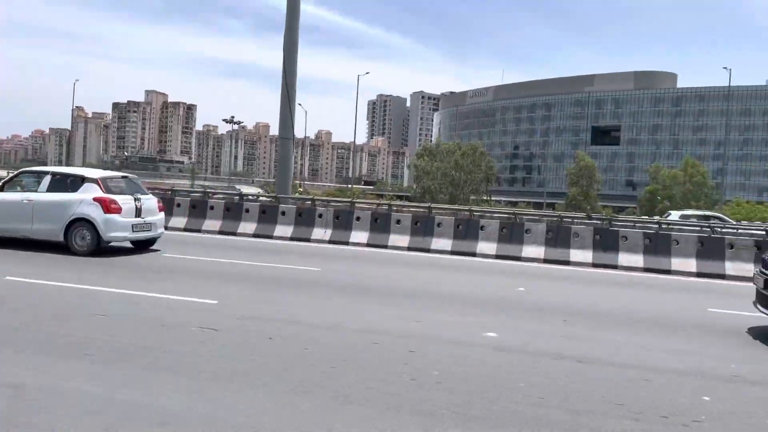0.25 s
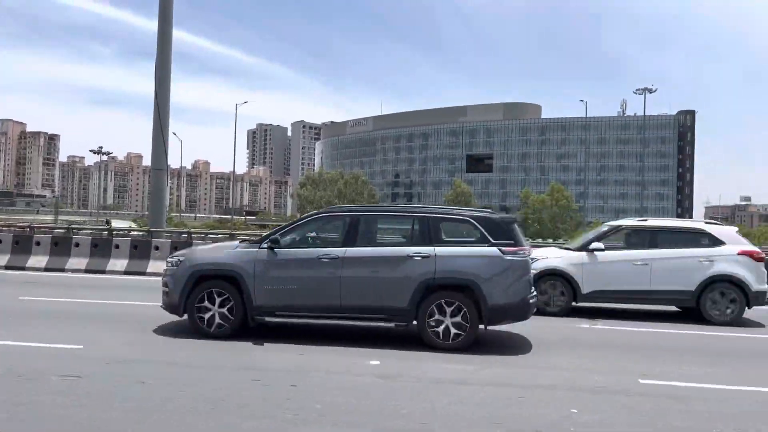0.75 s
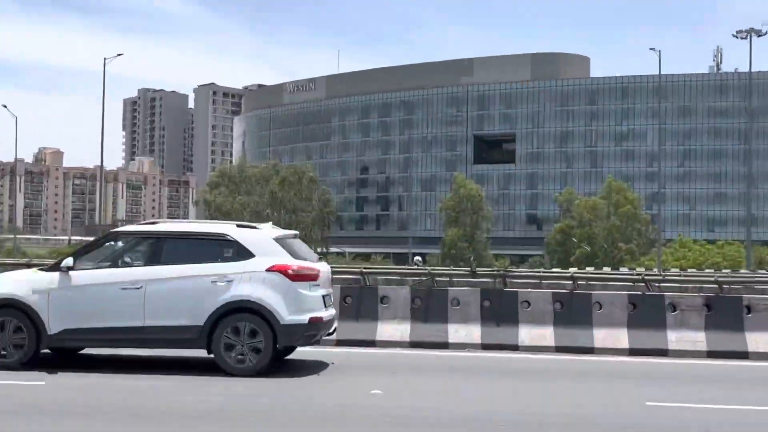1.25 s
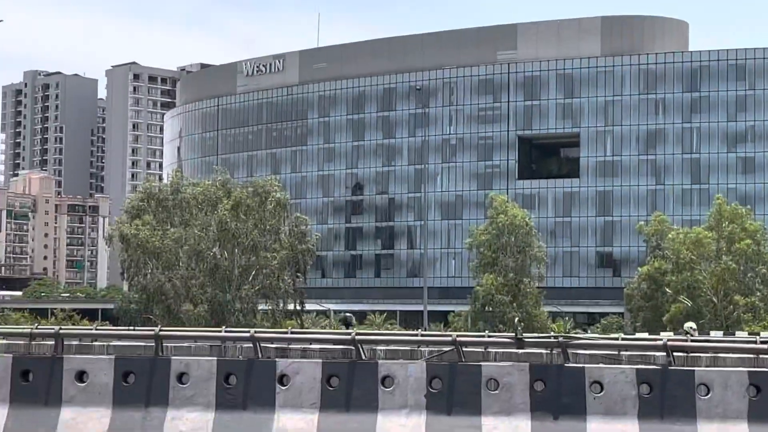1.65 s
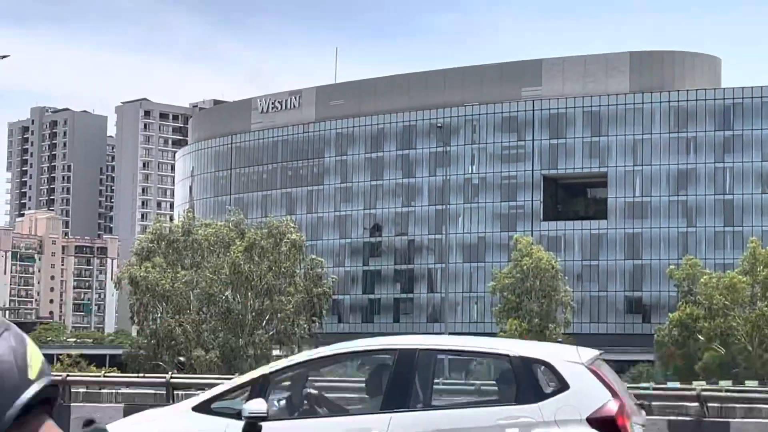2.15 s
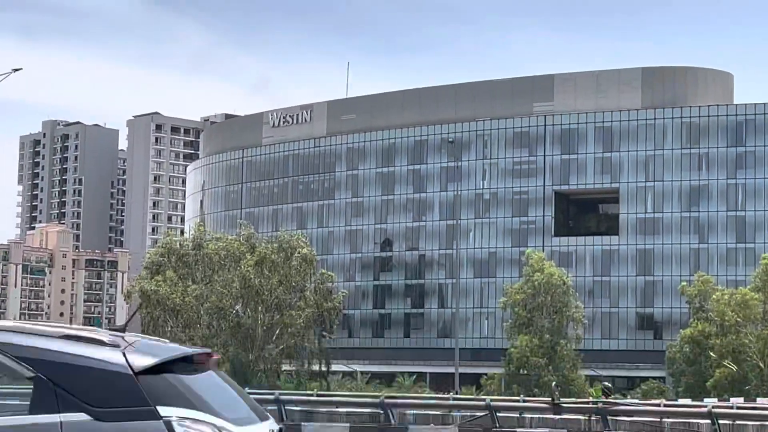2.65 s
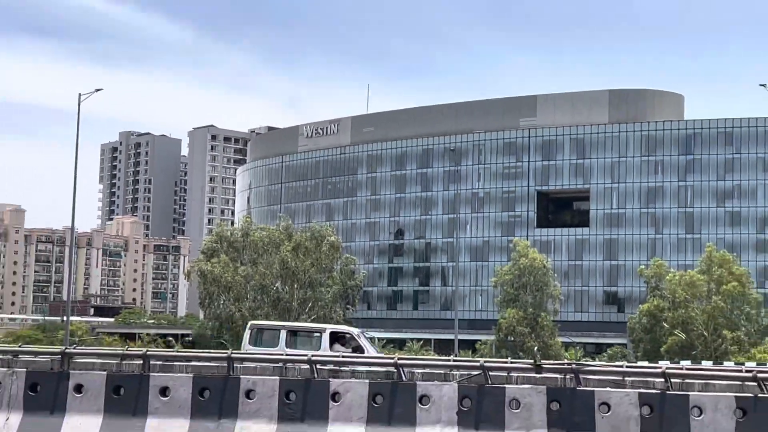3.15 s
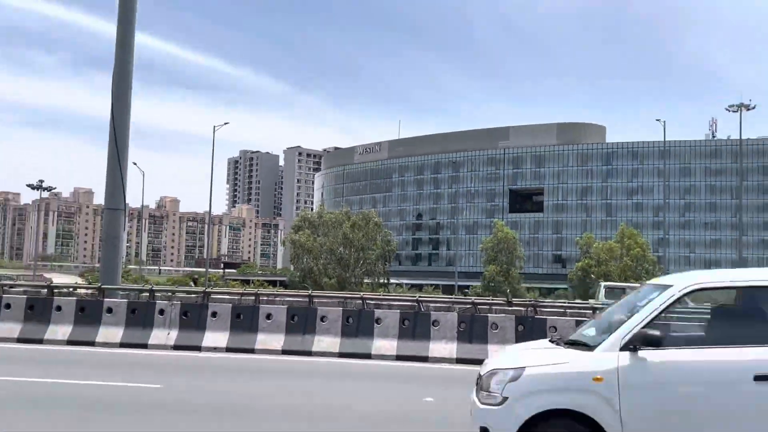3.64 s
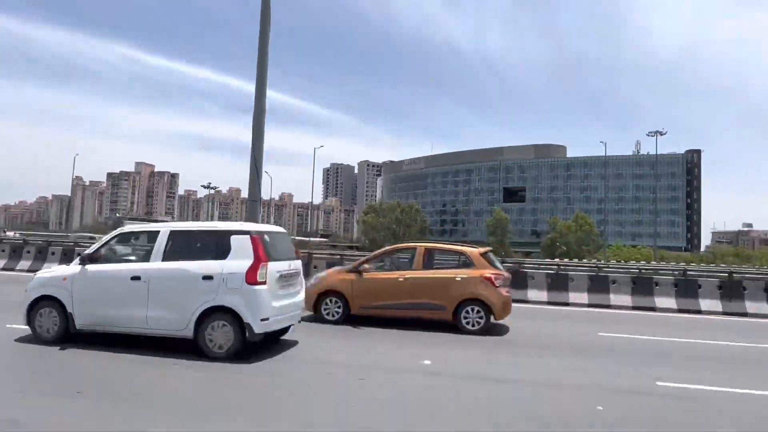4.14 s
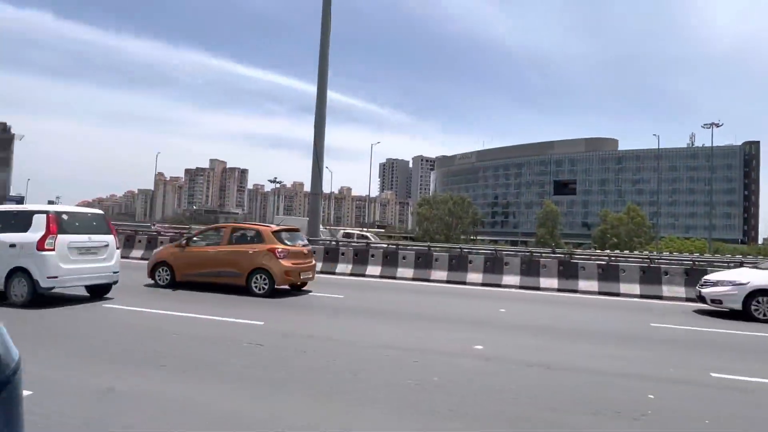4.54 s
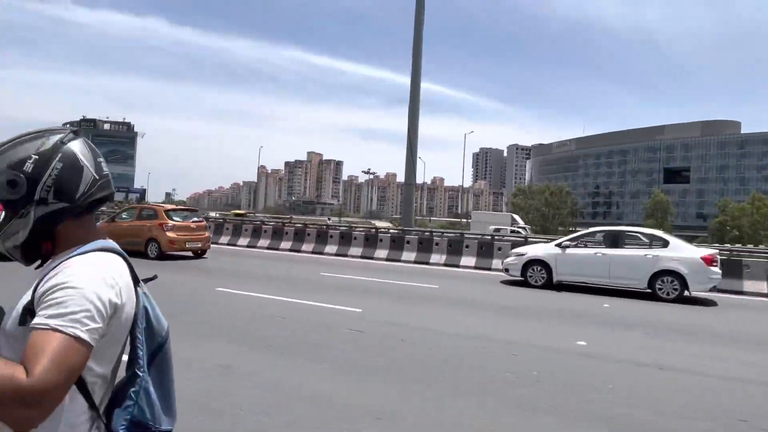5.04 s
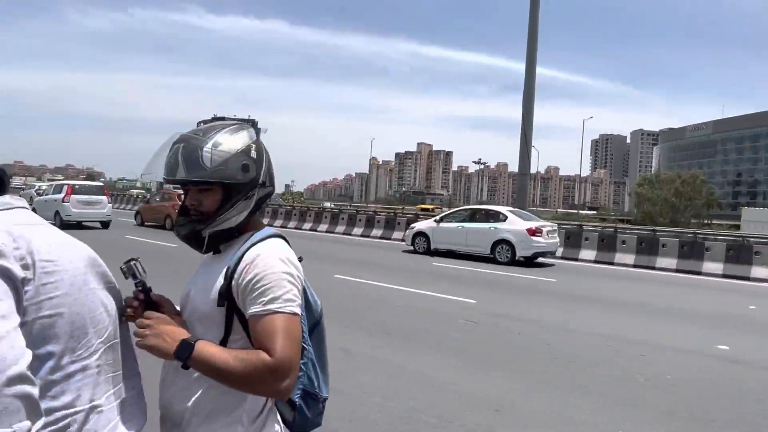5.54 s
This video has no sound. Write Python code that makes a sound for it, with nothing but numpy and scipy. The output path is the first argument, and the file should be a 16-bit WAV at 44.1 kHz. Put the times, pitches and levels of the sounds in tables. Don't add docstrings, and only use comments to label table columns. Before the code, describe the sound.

Busy highway traffic roars and hisses past while wind rumbles, flutters and pops against a handheld microphone, with a passing motorbike and brief squeaks.

```python
import sys
import numpy as np
from scipy import signal
from scipy.fft import rfft, irfft, next_fast_len
from scipy.io import wavfile
from scipy.ndimage import uniform_filter1d, map_coordinates

SR = 44100
rng = np.random.default_rng(int(sys.argv[2]) if len(sys.argv) > 2 else 0)


def wav_out(sig):
    wavfile.write(sys.argv[1], SR, np.round(np.clip(np.atleast_2d(sig).T, -1, 1) * 32767).astype(np.int16))


def makeup_ratio(level_db):
    decades = np.asarray(level_db, float) / 20
    return 10 ** decades


N = 255339


def unit(x):
    return x / np.sqrt(np.mean(abs(x) ** 2) + 1e-20)


def along(points, hz):
    f, v = np.transpose(points)
    return np.interp(np.log(hz + 1), np.log(f + 1), v)


def curves(rows):
    s, *cols = np.transpose(rows)
    return [np.interp(np.arange(N) / SR, s, c) for c in cols]


def wobble(rate):
    knots = rng.standard_normal(int(N * rate / SR) + 4)
    return map_coordinates(knots, [np.arange(N) * rate / SR])


def coloured(spectrum, size=N, stretch=1):
    m = next_fast_len(size + 4096)
    hz = np.fft.rfftfreq(m, 1 / SR)
    shaped = rfft(rng.standard_normal(m)) * makeup_ratio(along(spectrum, hz / stretch))
    return unit(irfft(shaped, m)[:size])


def left_right(mid, side):
    return np.array([mid + side, mid - side])


def port_gain(db, pan_db):
    return makeup_ratio(db + np.array([[pan_db], [-pan_db]]) / 2)


# time_s, aim (0 wide, 1 and 2 narrow ahead, 3 and 4 turning along the road)
BEAM_AIM = [(0, 0), (1.17, 0), (1.2, 1), (2.32, 1), (2.43, 2), (3.78, 2), (3.88, 2.5), (4.13, 2), (4.2, 3),
            (4.9, 3), (5.5, 4), (5.79, 4)]


def aim_share(aim):
    return np.clip(1 - abs(aim - np.arange(5)[:, None]), 0, 1)


def aimed(per_aim):
    aim, = curves(BEAM_AIM)
    return np.transpose(per_aim) @ aim_share(aim)


# time_s, level_db, pitch_hz, length_s
BRAKE_CHIRPS = [
    (.337, -46, 7030, .018),
    (.351, -47, 6770, .018),
    (.382, -53, 7150, .012),
    (.429, -46, 6920, .014),
    (.446, -46, 6810, .016),
    (.462, -48, 6960, .012),
    (.47, -52, 7150, .008),
]
# time_s, peak_db, pitch_hz, sides_against_centre_db
CASING_TICKS = [
    (3.2064, -52, 13900, -4),
    (3.2265, -39, 13700, -3),
    (3.2268, -52, 9100, 11),
    (3.3373, -40, 14000, -1),
    (3.3454, -52, 14300, -6),
    (4.6575, -47, 13300, -8),
    (4.8526, -39, 9900, -10),
    (5.1462, -44, 9820, -10),
    (5.444, -42, 9540, -10),
]


def small_sounds():
    t = np.arange(N) / SR
    chirps, ticks = np.zeros(N), np.zeros((2, N))
    for s, db, hz, length in BRAKE_CHIRPS:
        envelope = np.exp(-((t - s) / length * 2) ** 2)
        chirps += makeup_ratio(db) * envelope * np.sin(2 * np.pi * hz * t)
    for s, db, hz, side_db in CASING_TICKS:
        envelope = np.exp(-((t - s - .0007) / .00027) ** 2)
        tick = makeup_ratio(db + 2) * envelope * np.cos(2 * np.pi * hz * (t - s))
        ticks += tick * left_right(np.ones(1), makeup_ratio([side_db]))
    return left_right(makeup_ratio(5.5) * chirps, makeup_ratio(-2) * chirps) + ticks


# time_s, strength_db, shift_from_rumble_to_buffet_db
WIND_STRENGTH = [(0, -28, 1.5), (.2, -31, 0.5), (.55, -27.5, 3), (.74, -28.5, 2.5), (.9, -24, -.5),
                 (1.1, -29.5, 3), (1.45, -30, 0), (1.8, -28, 5), (2.1, -24.5, -1), (2.3, -22, -0.5),
                 (2.55, -22.5, -1.5), (2.95, -21, -0.5), (3.1, -24, -1), (3.45, -25.5, 1),
                 (3.75, -26.5, -1), (4.03, -30, 0), (4.58, -29, 0), (5.26, -33, 0.5), (5.79, -31.5, 1)]
# time_s, half_length_s, lift_db, shift_to_buffet_db
GUST_LIFTS = [(0.622, 0.062, 4, -3.5), (0.99, 0.065, 4.5, 1), (1.595, 0.07, 0.5, 1),
              (1.87, 0.064, 0.5, 2.5), (2.32, 0.048, -3, -3), (3.017, 0.044, -3, 6.5),
              (2.563, 0.03, 1, -1.5), (3.31, 0.061, 2, 2), (3.52, 0.035, -5, -1), (3.608, 0.047, 7.5, 0),
              (3.702, 0.026, -3.5, -1.5), (4.075, 0.045, 8.5, 1), (4.252, 0.22, -4.5, -0.5),
              (4.57, 0.06, 3.5, 1), (4.93, 0.026, -4, -2), (5.516, .07, 0, -3.5)]


def wind_db():
    strength_db, shift_db = curves(WIND_STRENGTH)
    t = np.arange(N) / SR
    for s, half, lift_db, move_db in GUST_LIFTS:
        bump = np.exp(-((t - s) / half) ** 2)
        strength_db = strength_db + lift_db * bump
        shift_db = shift_db + move_db * bump
    return strength_db - 3.0 - shift_db, strength_db - 3.5 + shift_db


# frequency_hz, density_db
RUMBLE_COLOUR = [(8, -90), (20, -39), (35, -14), (60, 5), (90, 0.5), (125, -5), (200, -50), (500, -120)]
# frequency_hz, density_db
BUFFET_COLOUR = [(30, -120), (60, -37), (110, -1), (180, 0), (300, -3), (480, -14), (1200, -120)]
PORTS_APART_DB = [-9, -9.5, -8, -0.5, 2]


def wind():
    rumble_db, buffet_db = wind_db()
    apart_db = aimed(PORTS_APART_DB)
    lump = wobble(28)

    def layer(colour, shake_db, extra_db):
        mid = unit(makeup_ratio(shake_db) * coloured(colour))
        side = unit(makeup_ratio(shake_db) * coloured(colour))
        return left_right(mid, makeup_ratio(apart_db + extra_db) * side)

    rumble = makeup_ratio(rumble_db + 0.14) * layer(RUMBLE_COLOUR, 0.51 * lump, -6.5)
    buffet = makeup_ratio(buffet_db - 0.85) * layer(BUFFET_COLOUR, 1.17 * lump + 1.77 * wobble(15), .1)
    return rumble + buffet


# frequency_hz, density_db
FLUTTER_COLOUR = [(60, -120), (180, -13), (300, 6), (500, -7), (800, -16), (1300, -34), (3000, -120)]
# start_s, length_s, level_db, eddy_speed_ratio
FLUTTER_BURSTS = [(0.973, 0.011, -27, 0.94), (2.446, 0.073, -32, 1.23), (2.949, 0.023, -21.5, 0.94),
                  (2.999, 0.011, -14.5, 0.87), (3.024, 0.023, -26, 1.2), (3.06, 0.011, -20, 1.06),
                  (3.079, 0.058, -27, 1.4), (3.21, 0.033, -25.5, 1.42), (3.261, 0.044, -28, 1.15),
                  (3.331, 0.044, -22.5, 1.45), (3.433, 0.026, -23, 1.58), (3.558, 0.027, -22, 1.3),
                  (3.589, 0.023, -16.5, 1.48), (3.618, 0.026, -19.5, 1.2), (3.652, 0.022, -33, 0.7),
                  (4.069, 0.0263, -26, 0.65), (4.304, 0.036, -30, 1.09), (4.42, 0.024, -32, 1.17),
                  (4.55, 0.04, -28.5, 1.2), (4.987, 0.03, -28, 1.4), (5.059, 0.013, -30, 0.88)]


def flutter():
    out, apart_db = np.zeros((2, N)), aimed(PORTS_APART_DB)
    t = np.arange(SR // 10) / SR
    for s, length, db, speed in FLUTTER_BURSTS:
        gate = np.clip(t / 0.0038, 0, 1) * np.clip((length - t) / 0.0057 + 1, 0, 1)
        grain = makeup_ratio(2.4 * map_coordinates(rng.standard_normal(24), [t * 130]))
        mid, side = (unit(gate * grain * coloured(FLUTTER_COLOUR, size=len(t), stretch=speed)) for _ in range(2))
        start = round(s * SR)
        pair = left_right(mid, makeup_ratio(apart_db[start] + 3.5) * side)
        out[:, start:][:, :len(t)] += makeup_ratio(db - 3) * np.sqrt(np.mean(gate ** 2)) * pair
    return out


# start_s, peak_db, pitch_hz, left_right_db
SINGLE_POPS = [(0.323, -21, 243, -8), (0.533, -25, 226, -0.5), (0.972, -15, 274, 9), (1.11, -13, 249, 2),
               (1.786, -16, 210, 1.5), (1.811, -9.5, 191, 0), (2.464, -6.5, 205, 0), (4.075, -14, 122, 0),
               (4.145, -13.5, 153, -1), (4.425, -18, 417, 0), (4.555, -22.5, 261, 6), (4.614, -18, 302, 4),
               (4.669, -17, 322, 3), (4.858, -15, 210, -1), (5.009, -17, 260, 2.0), (5.104, -22.5, 450, 8)]
EXHAUST_POP_S, EXHAUST_POP_GAP_S, EXHAUST_POP_COUNT = 2.068, .0327, 10
EXHAUST_POP_DB, EXHAUST_POP_HZ, EXHAUST_POP_SCATTER_DB = -11.5, 177, 1.5


def pops():
    out, t = np.zeros((2, N + SR)), np.arange(SR // 20) / SR
    train = [(EXHAUST_POP_S + k * EXHAUST_POP_GAP_S, EXHAUST_POP_DB + EXHAUST_POP_SCATTER_DB * rng.normal(), EXHAUST_POP_HZ, 0)
             for k in range(EXHAUST_POP_COUNT)]
    for s, db, hz, pan_db in SINGLE_POPS + train:
        u = t * hz
        swing = np.sin(2 * np.pi * u) * u * np.exp(-2.2 * u)
        out[:, round(s * SR):][:, :len(t)] += port_gain(db - 5, pan_db) * swing / abs(swing).max()
    return out[:, :N]


# time_s, peak_db, pitch_hz, left_right_db
FAST_EDDIES = [(2.957, -13.5, 389, 2), (2.963, -12, 267, 2), (2.966, -16, 526, 1), (2.981, -13, 361, 2),
               (3.002, -7.5, 383, 1), (3.008, -13, 389, -1), (3.028, -18, 335, 3), (3.034, -18, 488, 4),
               (3.042, -17, 420, 2), (3.063, -10, 517, 2), (3.068, -10.5, 526, 1), (3.097, -13.5, 526, 2),
               (3.112, -19, 567, 1), (3.119, -15, 361, 0), (3.128, -21, 612, 3), (3.236, -20, 660, 1),
               (3.262, -20, 1118, 1), (3.264, -15, 767, -1), (3.27, -13.5, 288, 0), (3.299, -20, 612, 3),
               (3.312, -14, 288, 2), (3.343, -28, 961, -3), (3.346, -10, 523, 3), (3.353, -18, 711, 2),
               (3.365, -10.5, 711, 1), (3.369, -16, 711, -6), (3.374, -15, 310, 0), (3.374, -16, 660, 1),
               (3.44, -21, 892, 1), (3.447, -14, 612, 1), (3.457, -16, 612, 1), (3.57, -21, 1037, -3),
               (3.572, -5.5, 590, 0), (3.577, -16, 961, 1), (3.579, -23, 660, 0), (3.593, -9, 892, -2),
               (3.6, -9, 767, 2), (3.606, -14, 526, 2), (3.607, -13, 961, 1), (3.609, -17, 1118, -1),
               (3.613, -23, 1118, 1), (3.62, -9, 612, 1), (3.628, -12, 488, -1), (3.632, -17, 892, 1),
               (3.635, -10, 485, 1), (3.645, -18, 452, 1)]
# time_s, peak_db, pitch_hz
SLOW_SURGES = [(2.307, -7.5, 174), (2.33, -16, 112), (2.332, -20, 240), (2.37, -16, 240),
               (2.383, -13.5, 152.4), (2.407, -9.5, 140), (2.433, -15.5, 223), (2.483, -17, 82),
               (2.519, -19, 177), (2.537, -13, 89), (2.554, -15.5, 223), (2.566, -16, 104),
               (2.572, -13.5, 206), (2.582, -14, 238), (2.588, -13, 96), (2.601, -15.5, 206),
               (2.672, -19, 89), (2.733, -16.5, 142), (2.753, -14, 96), (2.798, -19, 237),
               (2.809, -11.5, 82), (2.818, -14, 220), (2.837, -15, 121), (2.857, -8, 235),
               (2.873, -16, 141), (2.913, -14.5, 89), (2.936, -13.5, 223), (2.942, -12.5, 121),
               (2.946, -16, 206), (2.956, -20, 206), (2.966, -10.5, 152), (3.103, -14, 112),
               (3.137, -16, 121), (3.235, -14.5, 141), (3.319, -17, 112), (3.593, -14, 152),
               (3.606, -15, 223), (3.606, -10.5, 121), (3.619, -15, 141), (3.64, -10, 130),
               (.245, -22.5, 90), (.52, -17, 130), (.6, -18.5, 80), (.63, -23, 70), (0.891, -18, 90),
                (.975, -14, 90), (2.108, -16, 110), (2.19, -17, 79.8), (2.22, -15, 120),
                (3.749, -18.5, 119), (4.085, -18, 98), (4.605, -21, 90)]
# time_s, peak_db, pitch_hz, left_right_db
GUST_FRONTS = [(3.9, -23, 1400, 0.1), (3.5925, -18, 1200, 1), (3.6, -25, 1400, 0.1), (3.433, -20, 950, 1),
               (3.366, -27, 1500, 0.1), (2.8, -24, 830, 1), (2.7, -27, 1050, 0.1), (3.217, -23, 650, 1),
               (2.469, -15, 390, 0.1), (4.432, -21, 150, 0.1), (4.507, -25, 500, 0.1)]
EDDY_CYCLES, EDDY_DB = 0.72, -2
SURGE_CYCLES, SURGE_DB = 0.69, -1
PORT_SKEW = .2


def swirls():
    out, t = np.zeros((2, N)), np.arange(-SR // 20, SR // 20) / SR
    rows = [(s, db + EDDY_DB, hz, pan_db, EDDY_CYCLES) for s, db, hz, pan_db in FAST_EDDIES]
    rows += [(s, db + SURGE_DB, hz, 0, SURGE_CYCLES) for s, db, hz in SLOW_SURGES]
    rows += [(*front, EDDY_CYCLES) for front in GUST_FRONTS]
    for s, db, hz, pan_db, cycles in rows:
        turn, skew = rng.standard_normal(2)
        phase = 2 * np.pi * (hz * t + turn) + PORT_SKEW * skew * np.array([[1], [-1]])
        swing = np.exp(-(t * hz / cycles) ** 2) * np.cos(phase)
        out[:, round(s * SR) - SR // 20:][:, :len(t)] += port_gain(db, pan_db) * swing
    return out


# time_s, level_between_slips_db, pitch_hz
SQUEAK_COURSE = [
    (1.86, -50, 4760),
    (2.04, -48, 4710),
    (2.11, -48, 4630),
    (2.18, -48, 4560),
    (2.28, -54, 4520),
    (2.41, -60, 4460),
]
# time_s, peak_db
JOINT_SLIPS = [(1.8558, -42), (1.8692, -40), (1.9012, -37), (1.9102, -38), (1.9326, -30), (1.9459, -38),
               (1.9657, -31), (1.9781, -43), (2.0053, -31), (2.0123, -30), (2.0282, -42.5), (2.039, -36),
               (2.0481, -36), (2.0623, -38), (2.0704, -31), (2.0816, -32), (2.1044, -26.5), (2.1169, -42),
               (2.137, -36), (2.1466, -37), (2.1527, -40), (2.1632, -42), (2.1713, -28), (2.2023, -32),
               (2.2347, -32), (2.2505, -43), (2.2677, -33), (2.3044, -37), (2.3328, -42), (2.3717, -44)]


def far_bike():
    level_db, hz = curves(SQUEAK_COURSE)
    t, turns = np.arange(N) / SR, np.cumsum(hz) / SR
    heard = np.clip(np.minimum(t - SQUEAK_COURSE[0][0], SQUEAK_COURSE[-1][0] - t) / 0.043, 0, 1)
    rough = wobble(300) + 1j * wobble(300)
    out = makeup_ratio(level_db) * heard * unit(np.imag(rough * np.exp(2j * np.pi * turns)))
    for s, db in JOINT_SLIPS:
        turn, off = rng.standard_normal(2)
        tone = np.sin(2 * np.pi * (turns + turn + 55 * off * t))
        out = out + makeup_ratio(db + 1) * np.exp(-((t - s) / .0028) ** 2) * tone
    return out


def firings(rate, first_s):
    cycles = np.cumsum(rate) / SR
    cycles = cycles - cycles[round(first_s * SR)] % 1 + 1
    size = makeup_ratio(1.1 * rng.standard_normal(int(cycles[-1]) + 1))
    return cycles % 1, size[cycles.astype(int)]


# time_s, level_db, firing_rate_hz
THUD_COURSE = [
    (.2, -63, 20),
    (.31, -29, 23.6),
    (.55, -33.5, 23.5),
    (.68, -33, 27),
    (.8, -55, 22),
]


def near_bike():
    level_db, rate = curves(THUD_COURSE)
    phase, size = firings(rate, first_s=.322)
    since = phase / rate
    ring = 0
    for hz, db, t60 in [(253.0, 6, 0.055), (120, -14.0, 0.09)]:
        ring = ring + makeup_ratio(db - 60 * since / t60) * np.sin(2 * np.pi * hz * since)
    return makeup_ratio(level_db) * size * unit(ring)


# time_s, half_length_s, pitch_hz, glide_hz_per_s, level_db
CAR_DRONES = [
    (1.62, 0.1, 280, -300, -32),
    (1.31, 0.081, 120, -200, -35),
    (1.86, .07, 181, -100, -33),
    (1.27, .1, 1720, -500, -42),
    (1.75, 0.17, 1790, 50, -42),
    (2.6, 0.23, 1710, -22, -45),
    (2.3, .14, 2000, 400, -46),
    (2.95, .2, 1600, 50, -50),
    (5.22, 0.12, 1070, 450, -47),
]


def drones():
    t, out = np.arange(N) / SR, np.zeros(N)
    for s, half, hz, glide, db in CAR_DRONES:
        rough = wobble(45) + 1j * wobble(45)
        turns = (hz + glide * (t - s) / 2) * (t - s)
        out += makeup_ratio(db) * np.exp(-((t - s) / half) ** 2) * unit(np.imag(rough * np.exp(2j * np.pi * turns)))
    return out


FIRING_S, FIRING_GAP_S = 1.9675, .0335
PUFF_S, PUFF_HALF_S, PUFF_LENGTH_S = 2.08, .3, .003


def puffs():
    t = np.arange(N) / SR
    off = ((t - FIRING_S) / FIRING_GAP_S + .5) % 1 - .5
    return 1.2 * np.exp(-((t - PUFF_S) / PUFF_HALF_S) ** 2 - (off * FIRING_GAP_S / PUFF_LENGTH_S) ** 2)


# time_s, swell_db, nearness (-1 far and dull, 1 near and bright)
TRAFFIC_COURSE = [(0, -0.5, 0.1), (.21, -1, 0.47), (.48, 1.5, 0.38), (.77, 0, -0.25), (1.14, 2, 0.13),
                  (1.4, 2, 0.2), (2, 1, 0.42), (2.29, -1, -0.35), (2.5, 2, -0.3), (3, 0.5, 0.12),
                  (3.4, 0, 0), (3.68, 1.5, 0.48), (3.85, -0.5, 0.32), (4.35, .5, 0.053), (4.7, 0, 0.33),
                  (5, -0.5, 0.36), (5.24, -1.5, 0.52), (5.69, 1, 0.068), (5.79, 0, -0.015)]
# drone_db, roar_db, hiss_db, fizz_db
BEAM_PASS_DB = [(-38, -41, -44.5, -55), (-36.5, -35, -38.5, -51), (-43, -36, -46, -65),
                (-38.5, -38.5, -45.5, -65), (-36, -37, -43, -55.5)]
NEARNESS_DB = [-4, 1, 2.5, 4]


def traffic_db():
    swell_db, near = curves(TRAFFIC_COURSE)
    *quick_db, fizz_db = aimed(BEAM_PASS_DB)
    late_db = uniform_filter1d(fizz_db, size=SR // 14, origin=SR // 60)
    return np.array([*quick_db, late_db]) + swell_db + np.outer(NEARNESS_DB, near)


# frequency_hz, density_db
CENTRE_COLOUR = [
    [(260, -20), (450, -5.5), (1120, -5), (2860, -11), (6500, -27), (8100, -33.5), (10700, -35),
     (15000, -38.5)],
    [(260, -17), (450, -4.5), (1500, -4), (2160, -7.5), (4250, -12.5), (7420, -20), (10400, -22.5),
     (15000, -22.5)],
    [(260, -33), (450, -3.5), (1740, -8.5), (2470, -13.5), (5290, -25), (7750, -36.5), (11200, -40),
     (15000, -38.5)],
    [(260, -16.5), (450, -6), (951, -1), (2430, -6.5), (4060, -19.5), (6500, -29), (9700, -30.5),
     (15000, -39)],
    [(260, -7), (450, -3.5), (900, -3.5), (2010, -9), (6130, -20), (6890, -30.5), (9520, -31.5),
     (15000, -51.5)],
]
# frequency_hz, density_db
SIDES_COLOUR = [
    [(260, -31), (450, -5), (1640, 0), (1840, -15), (2860, -12.5), (4190, -21.5), (8350, -28.5),
     (15000, -39)],
    [(260, -34), (450, -8.5), (994, -7.5), (1570, -0.5), (3360, -34), (5530, -24.5), (10200, -20.5),
     (15000, -28)],
    [(260, -28), (450, -7.5), (1430, 0), (2010, -12.5), (3460, -37.5), (7990, -29.5), (10700, -39),
     (15000, -40)],
    [(260, -36), (450, -6), (1500, 1.5), (2470, -12), (5300, -24), (7420, -35), (10300, -31), (15000, -46)],
    [(260, -35), (450, -4.5), (786, -2.5), (1460, -5.5), (5140, -23.5), (7760, -35), (9810, -35),
     (15000, -52)],
]
# frequency_hz, width_hz, lift_per_aim_db
CENTRE_SPOTS = [(1675, 48, [1.5, -2, -3, 2, .1]), (1735, 146, [.1, 5.1, 4.6, 0.085, .1]),
                (2010, 33, [.1, 2.6, 1, .1, .1]), (3180, 350, [-2, -0.8, 0.5, -3.5, 1.5]),
                (4200, 310, [0.11, .1, .1, 1.9, .1]), (8620, 830, [-23, -25.5, -15, -3, -2.5]),
                (14450, 820, [-5, -10, -8, -5, -4])]
# frequency_hz, width_hz, lift_per_aim_db
SIDES_SPOTS = [(4430, 520, [-2, -50, -47, -5, 3]), (11900, 1020, [-40, -45, -36, -45, -40]),
               (15800, 700, [-1, -1, -5, -20, -25])]
SIDES_WIDTH_DB = [-1, 1, -2, 3, 4]


def beam_response(hz, share):
    def response_db(colours, spots):
        colour_db = np.transpose([along(colour, hz) for colour in colours])
        spots_db = sum(np.outer(np.exp(-((hz - peak_hz) / width_hz) ** 2), lift_db)
                       for peak_hz, width_hz, lift_db in spots)
        return colour_db + spots_db

    centre = makeup_ratio(response_db(CENTRE_COLOUR, CENTRE_SPOTS) @ share) * (hz < 14500)[:, None]
    sides = makeup_ratio((response_db(SIDES_COLOUR, SIDES_SPOTS) + SIDES_WIDTH_DB) @ share)
    return centre, sides


# time_s, half_length_s, pitch_hz,
# glide_hz_per_s, lift_db
PASSING_BANDS = [(1.88, 0.061, 1820, -100, 3), (2.29, 0.14, 1980, 400, 5.5), (4.7, 0.12, 4200, -300, 4.5),
                 (5.25, 0.18, 1060, 500, 3.5), (5.58, .15, 800, 200, 3), (5.55, .08, 1350, 0.1, 3),
                 (4.08, 0.18, 1130, 0.1, 5.5), (4, .13, 1960, 0.1, -3.5), (2.72, .17, 560, 0.1, 6.5),
                 (0.22, 0.097, 700, 0.1, 4.5), (4.8, .3, 6000, 0.1, 3.5), (1.57, 0.17, 730, 0.1, -2),
                 (4.8, 0.17, 380, 1, 15.5), (5.41, 0.3, 385, 0.1, 8)]


def passing_db(hz, t):
    lift = 0
    for s, half, band_hz, glide, lift_db in PASSING_BANDS:
        off = (hz[:, None] - band_hz - glide * (t - s)) / (0.085 * band_hz + 40)
        lift = lift + lift_db * np.exp(-((t - s) / half) ** 2 - off ** 2)
    return lift


# low_hz, high_hz
TYRE_BANDS_HZ = [(450, 900), (1200, 2800), (3200, 7000), (9800, 13500)]
BAND_LEAN = [(0.044, -0.22, 0.074, .02), (0.19, -0.85, .05, .02), (0.34, -0.84, .05, .02),
             (0.23, -0.063, 0.092, .02), (0.037, -0.43, 0.3, .02)]
FRAME = 512


def road():
    hz, t, z = signal.stft(rng.standard_normal((2, N)), SR, nperseg=FRAME)
    frames = np.minimum(t * SR, N - 1).astype(int)
    share = aim_share(np.interp(t, *np.transpose(BEAM_AIM)))
    centre, sides = beam_response(hz, share)

    middles_hz = np.sqrt(np.prod(TYRE_BANDS_HZ, axis=1))
    spread = np.transpose([along(list(zip(middles_hz, row)), hz) for row in np.eye(len(TYRE_BANDS_HZ))])
    inside = np.array([(hz >= lo) & (hz < hi) for lo, hi in TYRE_BANDS_HZ])
    have_db = 10 * np.log10(inside @ centre ** 2 / len(hz))
    swell = wobble(3.55)
    flicker_db = np.array([depth * (swell + wobble(14)) for depth in (0.63, 0.073, 0.34, 0.93)])
    level_db = spread @ ((traffic_db() + flicker_db)[:, frames] - have_db)
    level = makeup_ratio(level_db + passing_db(hz, t))

    field = uniform_filter1d(rng.standard_normal(z.shape[1:]), size=6, axis=0)
    field = uniform_filter1d(field, size=12, axis=1)
    speckle = uniform_filter1d(rng.standard_normal(z.shape), size=2, axis=1)
    speckle = uniform_filter1d(speckle, size=5, axis=2)
    speckle_db = (spread @ [1.2, 1.4, 1.8, 3.2])[:, None]
    z = z * level * makeup_ratio(0.39 * unit(field) + speckle_db * unit(speckle) - 0.24 * speckle_db ** 2)

    lean = np.clip(spread @ np.transpose(BAND_LEAN) @ share, -.9, .9)
    late = .55 * np.sqrt(1 - lean ** 2)
    alone = np.sqrt(np.abs(1 - lean ** 2 - late ** 2))
    other = (lean + 1j * late) * z[0] + alone * z[1]
    pair = np.array([z[0] * centre, other * sides])
    top_weight = np.clip(hz / 6000 - 1, 0, 1)[:, None]
    whole = signal.istft(pair, nperseg=FRAME)[1][:, :N]
    top = signal.istft(pair * top_weight, nperseg=FRAME)[1][:, :N]
    return left_right(*(whole + puffs() * top))


# time_s, wind_left_right_db, road_left_right_db
CAMERA_TURN = [(0.0, -0.5, 1.5), (0.9, -1.5, 1.0), (1.34, -0.5, 1), (2.06, -1.5, 0.5), (2.87, 0.5, -1),
               (4.37, 0.5, 2), (4.64, 3, 0.5), (5.51, -0.5, 1), (5.79, 2.5, 0.5)]


def scene():
    wind_pan, road_pan = (makeup_ratio(np.outer([.5, -.5], pan_db)) for pan_db in curves(CAMERA_TURN))
    at_ports = wind_pan * (wind() + flutter()) + pops() + swirls()
    bikes = near_bike() + far_bike()
    return small_sounds() + at_ports + bikes + drones() + road_pan * road()


def band_limit(x):
    return signal.sosfilt(signal.butter(12, 15800, fs=SR, output="sos"), x)


def record(dry):
    return band_limit(dry)


dry = scene()
out = record(dry)
wav_out(out)
```